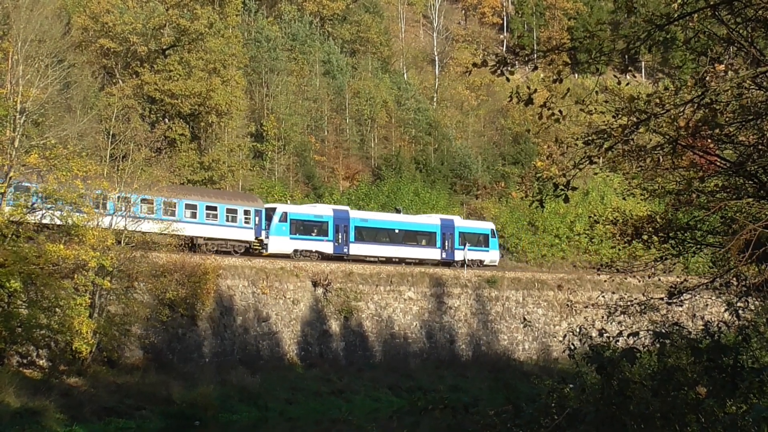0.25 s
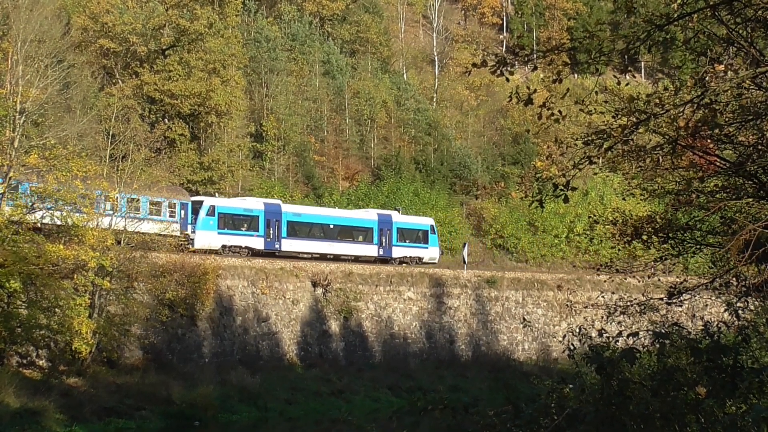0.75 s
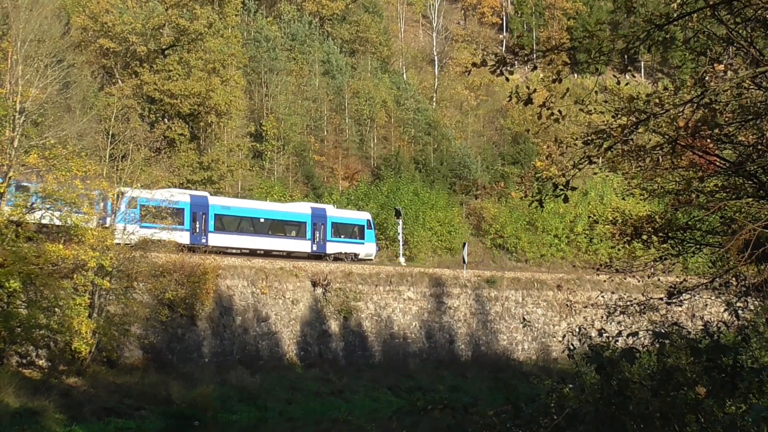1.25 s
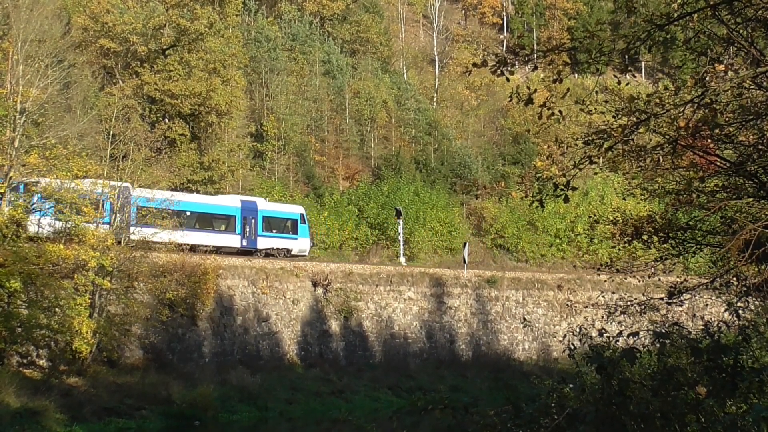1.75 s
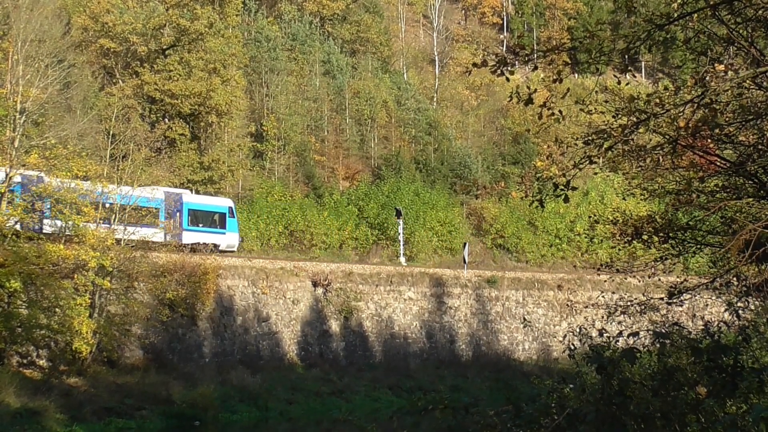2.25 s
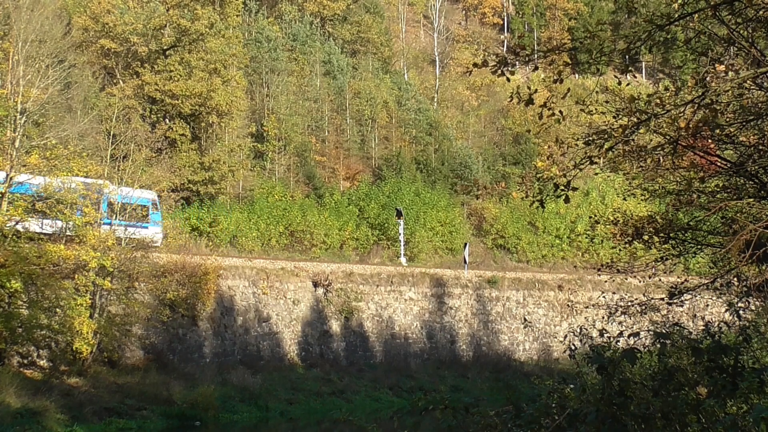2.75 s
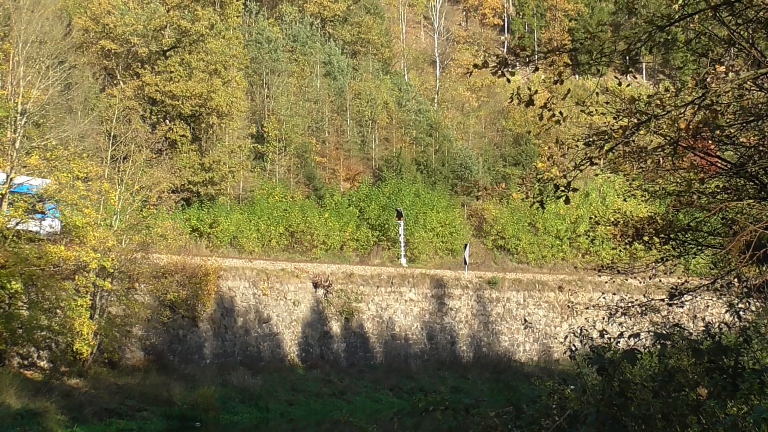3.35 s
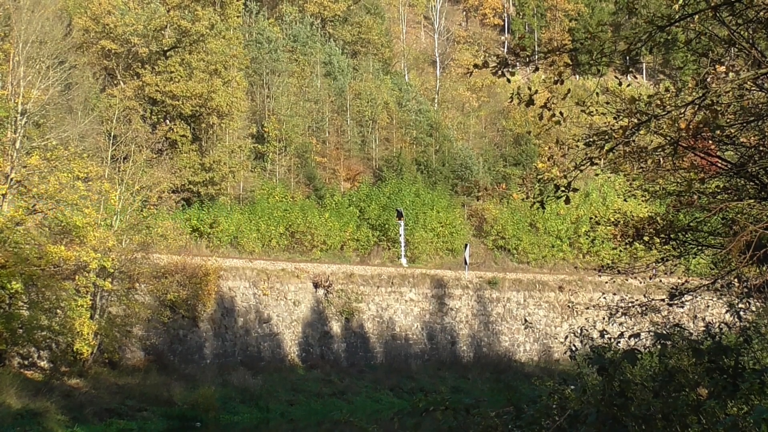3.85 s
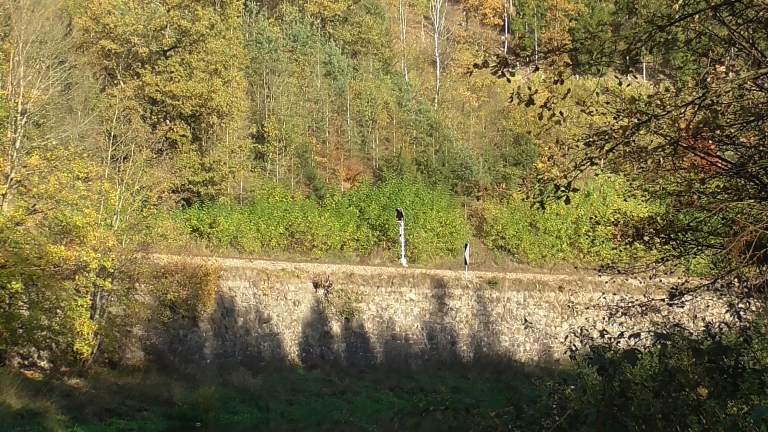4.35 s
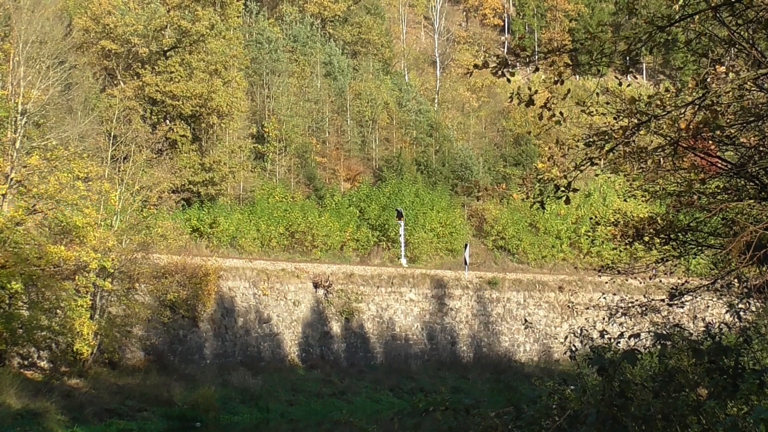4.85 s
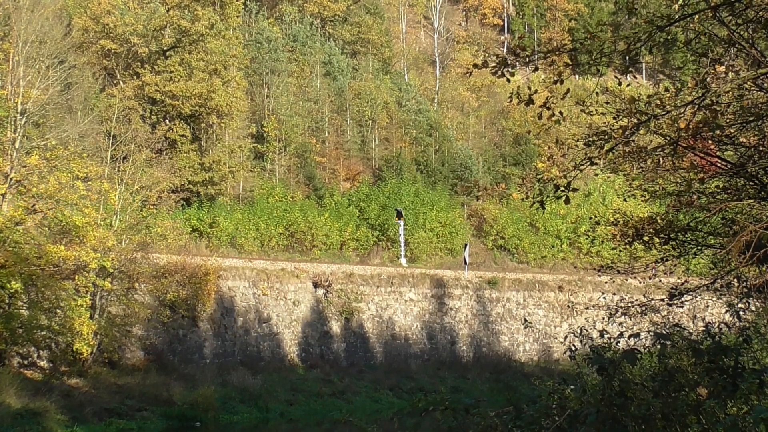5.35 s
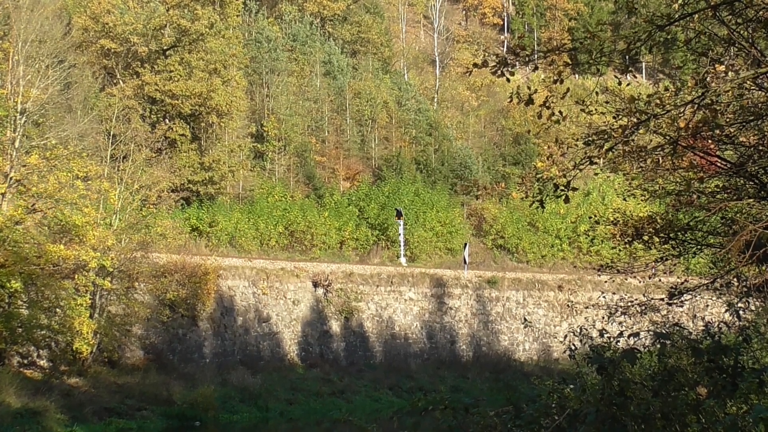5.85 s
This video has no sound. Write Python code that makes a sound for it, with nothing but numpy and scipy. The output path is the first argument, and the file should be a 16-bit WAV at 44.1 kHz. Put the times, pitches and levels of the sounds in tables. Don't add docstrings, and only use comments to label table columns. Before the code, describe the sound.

Trembling steel wheel squeal sings over a growing broad rumble of passing coaches across a valley, shifting higher and thinner midway, without stopping.

```python
import sys
import numpy as np
from scipy import signal
from scipy.fft import irfft, next_fast_len
from scipy.io import wavfile
from scipy.ndimage import uniform_filter1d

SR = 44100
rng = np.random.default_rng(int(sys.argv[2]) if len(sys.argv) > 2 else 0)


def to_wav(sig):
    pcm = np.clip(np.atleast_2d(sig), -1, 1) * 32767
    pcm = np.round(pcm).astype(np.int16)
    wavfile.write(sys.argv[1], SR, pcm.T)


def magnitude_from_level(level_db):
    exponent = np.asarray(level_db, float) / 20
    return 10 ** exponent


N = 269010
T = np.arange(N) / SR
SIDES = np.array([[1], [-1]]) / 2


def on_log(hz, table):
    columns = np.array(table)
    return np.interp(np.log(hz), np.log(columns[:, 0]), columns[:, 1])


def in_time(table):
    s, *columns = np.transpose(table)
    return [np.interp(T, s, column) for column in columns]


def walk(rate):
    k = int(SR / rate)
    held = np.repeat(rng.standard_normal(N // k + 1), k)
    return 1.3 * uniform_filter1d(uniform_filter1d(held, k), k)[:N]


def sidebands(shape, count=3, size=16384):
    hz = np.fft.fftfreq(size, N / SR / size)
    noise = rng.standard_normal((count, size)) + 1j * rng.standard_normal((count, size))
    z = np.fft.ifft(shape(hz) * noise)
    z = z / np.sqrt(np.mean(abs(z) ** 2))
    return np.array([np.interp(np.linspace(0, size - 1, N), np.arange(size), row) for row in z])


def spells(events, grow_db, fade_db):
    start, length, db = np.transpose(events)[:3, :, None]
    growth = grow_db * np.maximum(start - T, 0)
    decay = fade_db * np.maximum(T - start - length, 0)
    return np.max(db - growth - decay, axis=0)


# pitch_hz, likeness [0-1]
PORT_LIKENESS = [(30, .85), (60, .95), (200, .985), (700, .92), (1400, .68), (2900, .35), (5000, .38),
                 (10000, .2), (15000, .25)]


def likeness(hz):
    return np.clip(on_log(hz, PORT_LIKENESS), 0, 1)


# pitch_hz, lead_rad
PORT_LEAD = [(60, 0.069), (350, 0.28), (1000, 0.85), (3000, 0.99), (5500, 1.3), (8000, 2.16), (15000, 4.9)]


def port_lead(hz):
    return on_log(hz, PORT_LEAD)


# pitch_hz, left_minus_right_db
PORT_TILT = [(60, 0), (380, .3), (700, 2), (1300, 3), (2400, 3), (4400, 2), (8000, 0), (15000, -1.3)]


def port_tilt(hz):
    return on_log(hz, PORT_TILT)


def sing(hz, db, width_hz, like, lead, steady=0, skirt=0, pan_db=0):
    paths = sidebands(lambda f: 1 / (1 + (2 * f / width_hz) ** 2)) + skirt
    like = np.clip(like, 0, 1)
    direct = np.sqrt(like) * (steady + paths[0]) * np.exp(1j * lead * SIDES)
    scattered = np.sqrt(1 - like) * paths[1:]
    both = (direct + scattered) * np.sqrt(2 / (1 + like * steady ** 2))
    carrier = np.exp(2j * np.pi * np.cumsum(hz) / SR)
    return both * carrier * magnitude_from_level(db + (port_tilt(hz[0]) + pan_db) * SIDES)


# grow_db_per_s, fade_db_per_s
SLIP_RATES = [(134, 160), (112, 98), (71.4, 111), (68, 50), (60.5, 130)]
# tremble_width_hz, direct_share [0-1], tone_over_tremble [ratio]
MODE_CORE = [(16, .99, 6), (22, .86, 4.2), (16, .42, 2.4)]


def squeal(mode, pitch, events, skirt_db, skirt_hz, upper_db, edge_hz, pan_db):
    db = spells(events, *SLIP_RATES[mode]) + 0.83 * walk(21.34)
    start, length, _, lead = np.transpose(events)
    trend_db = uniform_filter1d(db, int(.3 * SR)) - db

    def skirt_shape(f):
        upper = magnitude_from_level(upper_db * (1 + np.tanh(f / 25)) / 2)
        notch = 1 - 0.37 * np.exp(-(f / 22) ** 2)
        return np.exp(-abs(f) / skirt_hz) * upper / (1 + (f / edge_hz) ** 4) * notch

    skirt = magnitude_from_level(skirt_db + trend_db) * sidebands(skirt_shape)
    sounding = np.clip((pitch[-1][0] + .05 - T) / .1, 0, 1)
    width_hz, like, steady = MODE_CORE[mode]
    lead_now = np.interp(T, start + length / 2, lead)
    tone = sing(in_time(pitch)[0], db - 4.0, width_hz, like, lead_now, steady, skirt, pan_db)
    return sounding * tone


# time_s, pitch_hz
LOW_PITCH = [(0, 1881), (2, 1876), (3.3, 1868), (3.55, 1866)]
# start_s, length_s, level_db, left_lead_rad
LOW_SPELLS = [(0, 0.028, -29, 0.27), (0.095, 0.024, -39, .25), (0.28, 0.13, -31.5, 0.17),
              (0.502, 0.087, -37, .3), (0.652, 0.21, -37, 0.35), (0.844, 0.16, -36, .3),
              (1.073, 0.018, -30.5, .3), (1.17, 0.13, -32, 0.14), (1.38, 0.045, -38, .2),
              (1.516, 0.067, -34, 0.32), (1.597, 0.031, -28.5, .25), (1.706, 0.06, -27, 0.25),
              (1.85, 0.061, -37.5, .25), (2.112, 0.13, -34.5, 0.25), (2.28, 0.2, -33, 0.25),
              (2.544, 0.085, -33, 0.23), (2.76, 0.048, -39, .3), (2.87, 0.057, -30, 0.23),
              (3.002, 0.097, -30, 0.49), (3.146, .06, -35.5, 0.57), (3.207, 0.05, -30, 0.49),
              (3.417, 0.05, -46, 0.32)]


def low_squeal():
    return squeal(0, LOW_PITCH, LOW_SPELLS, skirt_db=13, skirt_hz=58, upper_db=0, edge_hz=200,
                  pan_db=-.4).real


# time_s, pitch_hz
MIDDLE_PITCH = [(0, 3746), (1.5, 3731), (2.3, 3710), (2.75, 3695), (2.8, 3740), (3.7, 3726)]
# start_s, length_s, level_db, left_lead_rad
MIDDLE_SPELLS = [(0, 0.065, -24, 0.37), (.2, .13, -25.5, 0.22), (.36, 0.066, -23, 0.24),
                 (.62, 0.067, -21.5, 0.37), (.8, 0.16, -23.5, 0.5), (1.1, 0.21, -24, 0.53),
                 (1.45, 0.019, -22, .8), (1.56, 0.031, -22, 1), (1.7, 0.13, -25, 1), (1.9, 0.019, -27, 1),
                 (2.08, 0.056, -21, 0.97), (2.19, 0.05, -22.5, 1), (2.33, 0.12, -27.5, .95),
                 (2.5, 0.042, -31, .95), (2.63, 0.1, -33.5, 1), (2.85, 0.045, -41.5, 0.79),
                 (3.0, 0.16, -34, 0.89), (3.258, 0.15, -32.5, 0.98), (3.449, 0.089, -27, 0.99)]


def middle_squeal():
    tone = squeal(1, MIDDLE_PITCH, MIDDLE_SPELLS, skirt_db=12.34, skirt_hz=110, upper_db=-5.5,
                  edge_hz=350, pan_db=-0.33)
    return (tone + magnitude_from_level(-15.0) * tone ** 2).real


# first_hz, last_hz, width_hz, tone_over_tremble [ratio]
RING_MODES = [(660, 664, 24, 1.0), (248, 244, 18, 1.2), (994, 990, 40, .6), (178, 182, 40, .6),
              (318, 310, 36, .7), (385, 372, 44, .6), (800, 775, 60, .4), (4480, 4452, 32, 1.5),
              (5725, 5710, 24, 2.6), (6860, 6850, 25, 2.0), (8790, 8750, 40, 1.1), (15190, 15120, 70, 1.2),
              (3560, 3535, 40, .6), (3960, 3925, 70, .5), (4785, 4770, 30, 1.5), (4400, 4390, 40, 1.0)]
# start_s, length_s, level_db
RAIL_SPELLS = [
    [(0, 0.41, -36.5), (.5, 1.57, -42), (2.7, 0.46, -34), (3.2, 0.042, -29), (3.65, 0.63, -35.5),
     (4.35, 0.17, -26.5), (4.68, 0.06, -29), (4.95, 0.13, -27.5), (5.3, 0.22, -30.5), (5.75, 0.14, -23)],
    [(0, 0.31, -34), (.55, 0.097, -35.5), (.85, .03, -33.5), (1.0, 0.25, -35.5), (1.5, 0.61, -42),
     (2.0, 0.14, -32.5), (2.35, 0.044, -35), (2.55, 0.13, -34), (2.8, 0.12, -25), (3.15, 0.06, -31),
     (3.3, 0.23, -29.5), (3.7, 0.049, -29.5), (3.9, 0.068, -25), (4.33, 0.05, -29), (4.5, 0.091, -30.5),
     (4.85, 0.27, -29), (5.15, 0.056, -29), (5.7, 0.09, -35), (5.95, 0.094, -45)],
    [(.25, 0.052, -35.5), (.5, 0.19, -41.5), (1.05, .1, -43.5), (1.6, 0.087, -47), (2.6, 1, -37),
     (3.75, 0.096, -31), (4.1, 0.54, -33.5), (4.76, 0.051, -33.5), (5.0, 0.059, -33.5)],
]
# start_s, length_s, level_db
MORE_RAIL_SPELLS = [
    [(3.95, .05, -33.5), (4.6, 0.13, -30), (5.1, 0.1, -31), (5.28, 0.045, -30), (5.56, 0.13, -30),
     (5.85, 0.037, -29.5), (6.0, .1, -31)],
    [(.6, 0.1, -31.5), (3.0, .1, -50), (3.8, 0.086, -25.5), (4.0, 0.024, -33), (4.29, .03, -30.5),
     (4.7, 0.046, -32), (5.07, .07, -25), (5.2, .03, -32.5), (5.32, .04, -29), (5.56, .06, -26),
     (5.78, 0.062, -26), (6.05, .05, -34)],
    [(2.4, 0.079, -41), (2.76, .05, -31.5), (2.95, 0.075, -33.5), (4.0, 0.027, -35), (4.3, 0.039, -44),
     (5.14, 0.035, -27.5), (5.52, .1, -33), (5.68, .03, -30), (5.85, 0.044, -29.5)],
    [(2.88, 0.045, -31.5), (3.23, 0.034, -30.5), (4.55, 0.052, -30), (4.72, 0.067, -27.5),
     (4.97, .13, -25.5), (5.2, 0.058, -33), (5.66, .06, -27.5), (5.92, 0.21, -29.5)],
]
# start_s, length_s, level_db
DISC_SPELLS = [
    [(.15, .2, -47.5), (.55, .4, -49.5), (1.0, 0.29, -44.5), (1.4, .6, -55), (2.1, 0.17, -49),
     (2.35, .15, -45), (2.55, 0.25, -39.5), (3.0, 0.35, -46.5), (3.5, .12, -51), (3.78, .25, -46)],
    [(2.42, 0.13, -61), (2.6, .12, -53), (2.75, 0.1, -44.5)],
    [(4.798, 0.094, -44)],
    [(2.6, 1, -52), (3.7, 0.37, -44), (4.85, 0.31, -42), (5.2, 0.3, -46.5)],
    [(2.14, 0.097, -54), (2.35, 0.5, -58)],
    [(0, 0.41, -53), (.6, 0.81, -48), (1.4, 0.45, -59), (2.1, 0.4, -49)],
    [(.3, 0.33, -60), (.7, 0.36, -43), (1.5, 1, -45)],
    [(2.55, .2, -48), (3.35, .1, -52), (4.82, 0.071, -47)],
    [(4.3, .2, -50), (4.85, 0.35, -65), (5.75, 0.21, -51)],
]


def rings():
    track = RAIL_SPELLS + MORE_RAIL_SPELLS
    rates = [SLIP_RATES[3]] * len(track) + [SLIP_RATES[4]] * len(DISC_SPELLS)
    out = 0
    for (first, last, width_hz, steady), ring, rate in zip(RING_MODES, track + DISC_SPELLS, rates):
        ends_s = [ring[0][0], sum(ring[-1][:2])]
        hz = np.interp(T, ends_s, [first, last]) + 4 * walk(4)
        db = spells(ring, *rate)
        out = out + sing(hz, db, width_hz, likeness(first), port_lead(first), steady).real
    return out


# time_s, level_db
NEARNESS = [(0, -14.5), (.35, -10), (.55, -14.5), (.8, -10.5), (1.4, -14.5), (2.2, -12.5), (3.1, -5),
            (3.45, -6), (3.9, -7), (4.25, -7), (4.7, -1.5), (5.2, -2.5), (5.45, -4.5), (5.65, -3),
            (5.85, -4), (6.1, 2.5)]
# time_s, strength [0-1]
BOGIE_PASSES = [
    (2.5, 0.13),
    (2.8, 0.88),
    (3.74, 0.49),
    (3.95, 0.88),
    (4.35, 1),
    (4.95, 0.69),
    (5.3, 0.38),
    (5.7, 0.66),
]
# pitch_hz, near_db_per_db, clear_gain_db, bogie_gain_db
ROAR_ANSWER = [(66, 0.7, -1, 0.5), (170, 1.8, -2.5, 5), (391, 0.66, -5.5, 0.5), (530, 1.22, 0.5, 5),
               (846, 0.7457, 0, 2.5), (2600, 0.4642, 2.5, 3), (12200, 0.18, 6, 7), (13600, 0.5, 12, 6.5)]


def passing():
    near = uniform_filter1d(in_time(NEARNESS)[0], int(.08 * SR))
    clear_s, clear_spread_s = 2.19, 0.57
    clear = (1 + np.tanh((T - clear_s) / clear_spread_s)) / 2
    rise_s, fall_s = 0.24, 0.19
    bogies = 0
    for s, strength in BOGIE_PASSES:
        bogies = bogies + strength * np.exp(-((T - s) / np.where(T < s, rise_s, fall_s)) ** 2)
    curves = np.array(ROAR_ANSWER)[:, 1:] @ np.array([near, clear, bogies])
    return curves - curves[:, T > 4.4].mean(axis=1)[:, None]


# pitch_hz, density_db_per_hz
ROAR_SPECTRUM = [(25, -36), (60, -20.5), (113, -10.5), (183, -8), (313, -4), (500, -8), (750, -5),
                 (1100, -16), (1570, -21.5), (2900, -29.5), (4400, -27.5), (6450, -37.5), (8500, -29),
                 (14500, -48)]


def roar_db(hz, curves):
    answer_hz = np.array(ROAR_ANSWER)[:, 0]
    shares = [np.interp(np.log(hz), np.log(answer_hz), row) for row in np.eye(len(answer_hz))]
    return -46.5 + on_log(hz, ROAR_SPECTRUM) + shares @ curves


# pitch_hz, width_hz, depth [0-1]
ROAR_DIPS = [(5550, 200, .5), (6030, 150, .35), (6480, 150, .4), (10400, 200, .55), (11150, 200, .3),
             (12150, 250, .3), (14880, 200, .6)]


def rolling_roar(curves):
    size = next_fast_len(N)
    f = np.fft.rfftfreq(size, 1 / SR) + 1
    like = likeness(f)
    noise = rng.standard_normal((3, len(f))) + 1j * rng.standard_normal((3, len(f)))
    shared = np.sqrt(like) * noise[0] * np.exp(1j * port_lead(f) * SIDES)
    ports = shared + np.sqrt(1 - like) * noise[1:]
    ports = ports * magnitude_from_level(port_tilt(f) * SIDES) * np.sqrt(size * SR) / 2
    for hz, width_hz, depth in ROAR_DIPS:
        ports = ports * (1 - depth / (1 + (2 * (f - hz) / width_hz) ** 2))
    out = 0
    for hz in 25 * 2 ** np.arange(0, 9.4, 1 / 3):
        band = np.cos(np.pi / 2 * np.clip(3 * np.log2(f / hz), -1, 1))
        flicker_db = 2.36 * walk(7)
        out = out + irfft(ports * band, size)[:, :N] * magnitude_from_level(roar_db(hz, curves) + flicker_db)
    return out


RUNG_HZ = [190, 315, 410, 500, 780, 1300, 1640, 1775, 2110, 2500, 2800, 3680, 4330, 4425, 4775]
RUNG_HZ = RUNG_HZ[:15] + [5255, 5825, 6175, 6800, 7350, 9570, 10080, 10790, 11620, 12750, 13120, 14050,
                          14700, 15150]
# width_hz, level_over_roar_db
RUNG_MODES = [(28.8, 1.5), (39.2, -3), (43.5, 3), (40.6, 2.5), (60.4, -4.7), (52.7, 5.5), (35, 0.5),
              (35, 2), (71.4, 6), (40.2, 7.5), (49.7, -14), (148, 6), (240, 5), (50, 6), (44, 6.5), (80, 5),
              (80, 10.5), (70, 5.5), (140, 7), (90, 11), (120, 4.5), (160, 5), (220, 4.5), (400, 6.5),
              (450, 10), (200, 7), (202, 13), (150, 13), (120, 1)]


def rung_modes(curves):
    out = 0
    for hz, (width_hz, db) in zip(RUNG_HZ, RUNG_MODES):
        patchy_db = roar_db(hz, curves) + db + 10 * np.log10(width_hz) + 2.0 * walk(5.5)
        wandering_hz = hz * (1 + .006 * walk(1.5))
        out = out + sing(wandering_hz, patchy_db, width_hz, likeness(hz), port_lead(hz)).real
    return out


# time_s, pitch_hz
HIGH_PITCH = [(1.4, 7915), (2.8, 7888), (3.5, 7852), (4.06, 7824), (4.13, 7846), (4.42, 7820), (4.5, 7826),
              (4.93, 7790), (4.98, 7862), (5.5, 7832), (6.1, 7802)]
# start_s, length_s, level_db, left_lead_rad
HIGH_SPELLS = [(1.5, 0.23, -55, 5.3), (1.85, .3, -41, 2.3), (2.28, 0.069, -36, 2.3), (2.6, 0.057, -30, 2.6),
               (2.86, 0.15, -22.5, 2.9), (3.0, 0.17, -25, 1.46), (3.28, 0.16, -23, 1.95),
               (3.55, 0.087, -21.5, 2.1), (3.67, .06, -29, 2.2), (3.82, 0.12, -21.5, 4.7),
               (3.95, 0.19, -21, 1.7), (4.2, 0.14, -25.5, 1.1), (4.4, 0.037, -28, 1.9),
               (4.5, 0.13, -22, 0.73), (4.661, .05, -37, 2.7), (4.76, 0.07, -27, 2.2),
               (4.92, .05, -29, 2.8), (5.049, 0.2, -22, 4.7), (5.25, 0.25, -24.5, 3.4),
               (5.42, 0.067, -24.5, 4.6), (5.62, 0.33, -23.5, 3.6), (5.9, 0.087, -35, 3.6),
               (6.03, .07, -39, 3.4)]


def high_squeal():
    return squeal(2, HIGH_PITCH, HIGH_SPELLS, skirt_db=1.7, skirt_hz=165, upper_db=-1.5, edge_hz=580,
                  pan_db=-0.23).real


def scene():
    curves = passing()
    squeals = low_squeal() + middle_squeal() + high_squeal()
    return squeals + rings() + rolling_roar(curves) + rung_modes(curves)


def top_cut(x):
    return signal.sosfilt(signal.butter(12, 15640, fs=SR, output="sos"), x)


def record(dry):
    low_pass = signal.ellip(10, .2, 70, 15200, fs=SR, output="sos")
    cut = signal.sosfilt(low_pass, dry)
    return top_cut(cut)


dry = scene()
out = record(dry)
to_wav(out)
```